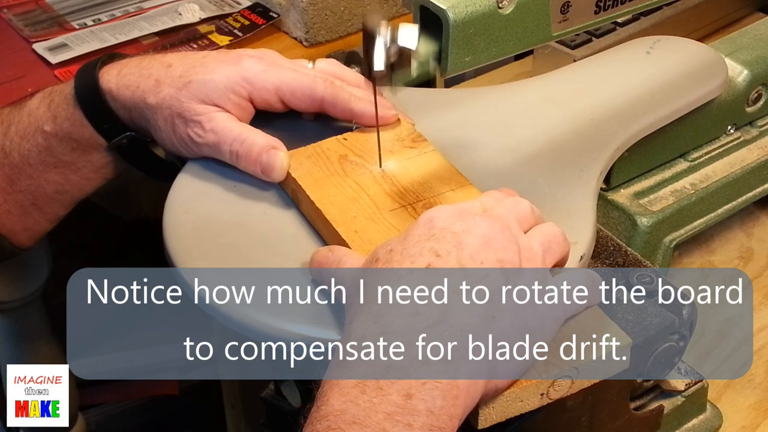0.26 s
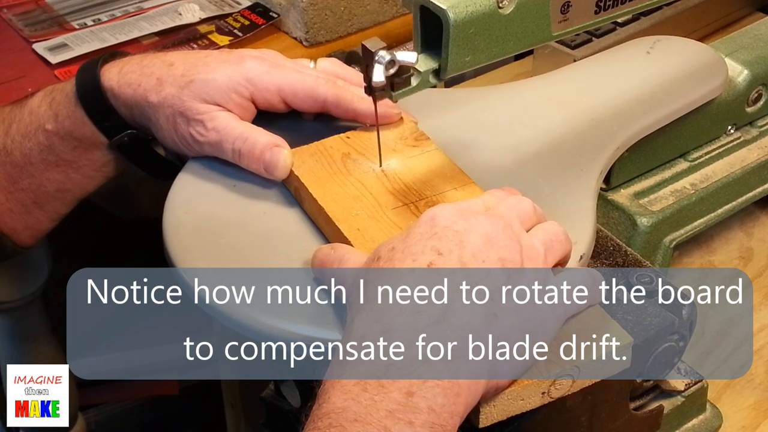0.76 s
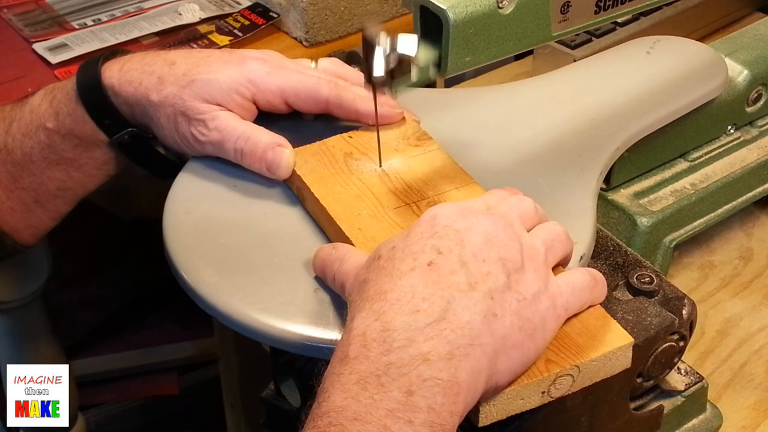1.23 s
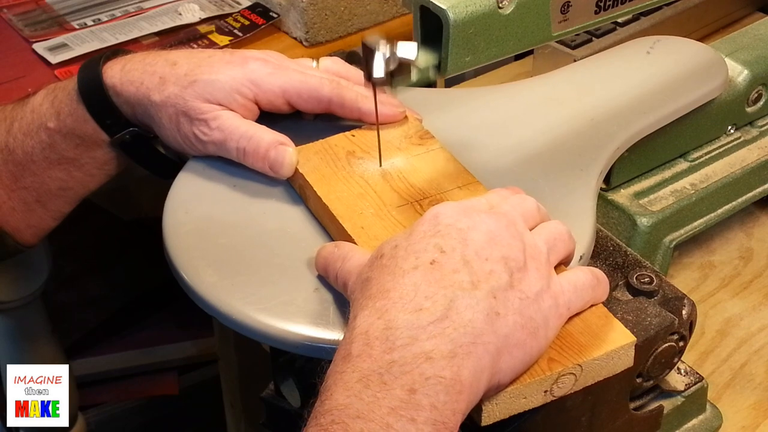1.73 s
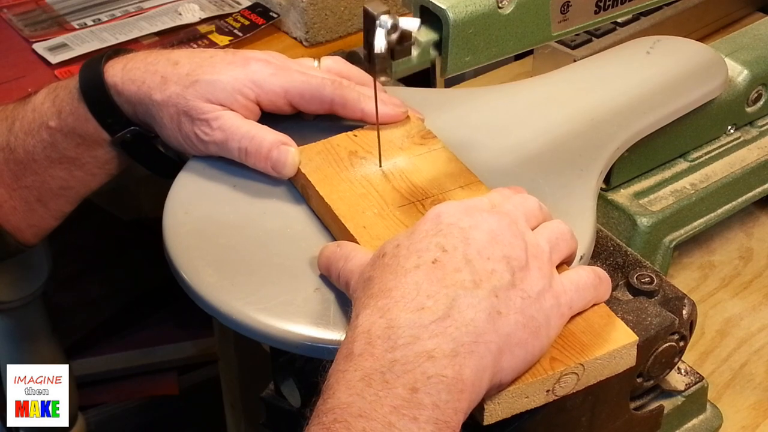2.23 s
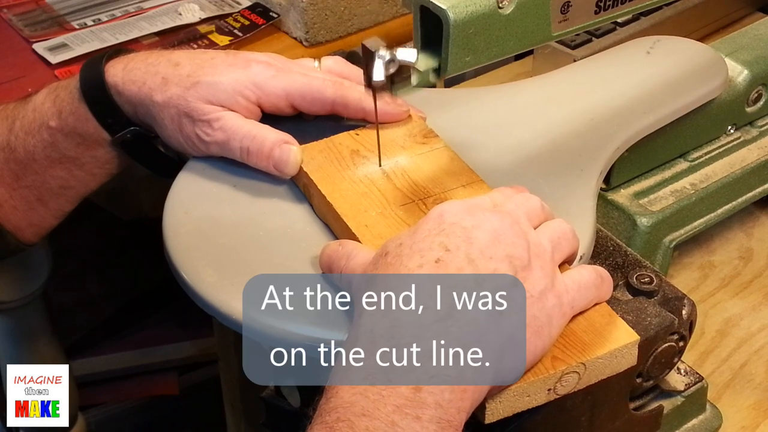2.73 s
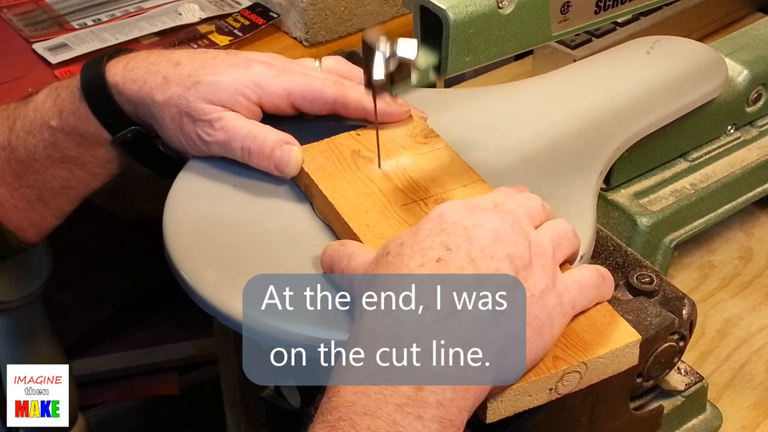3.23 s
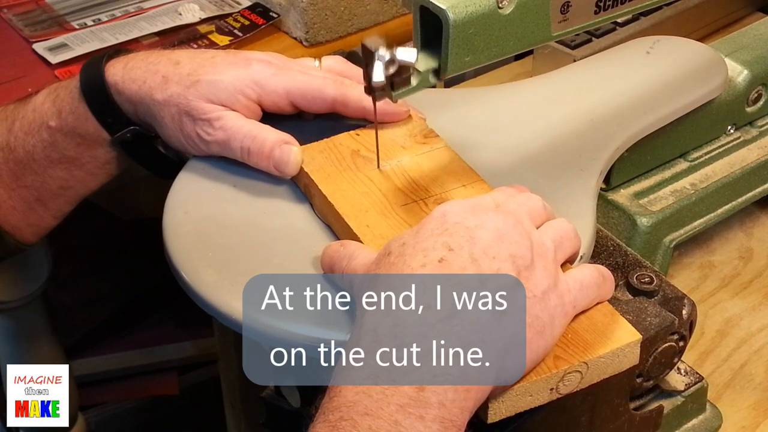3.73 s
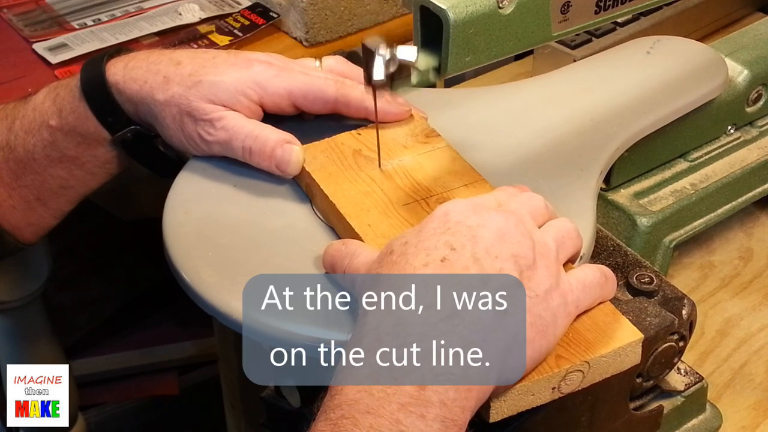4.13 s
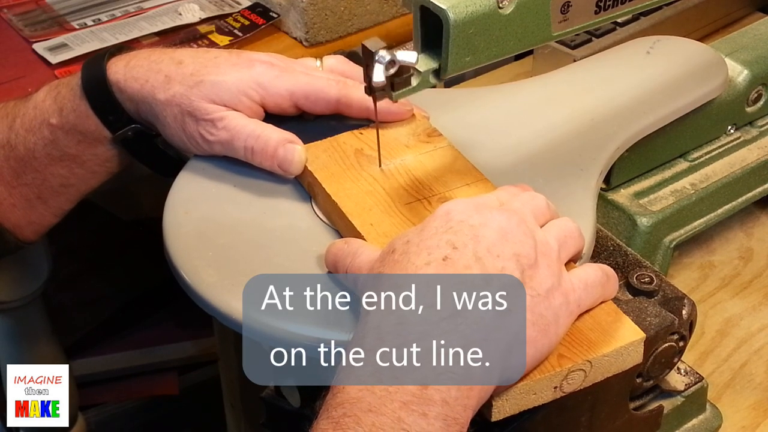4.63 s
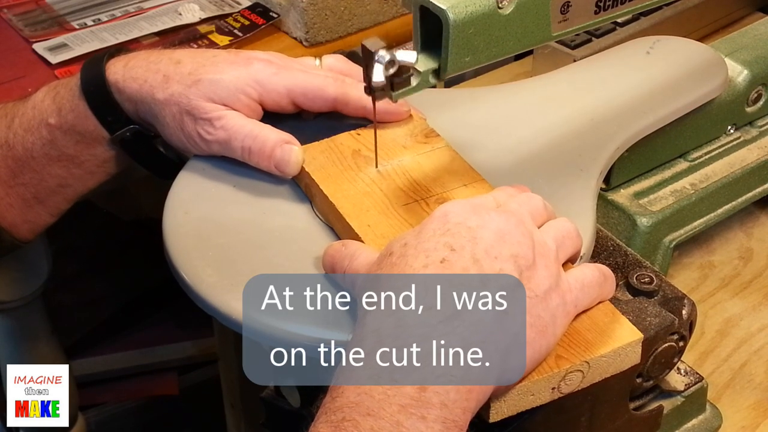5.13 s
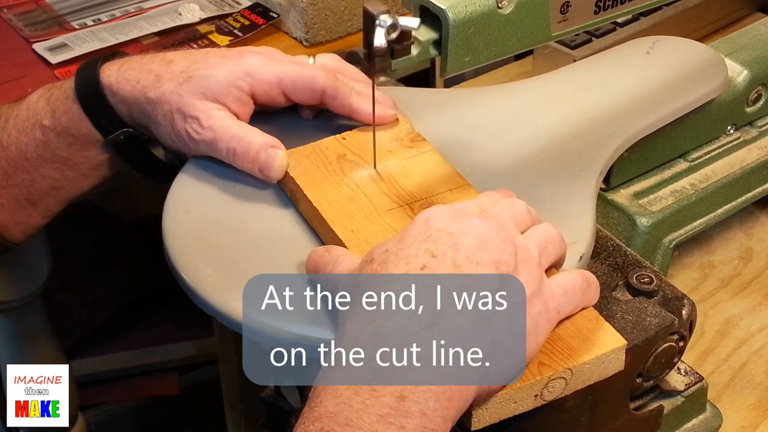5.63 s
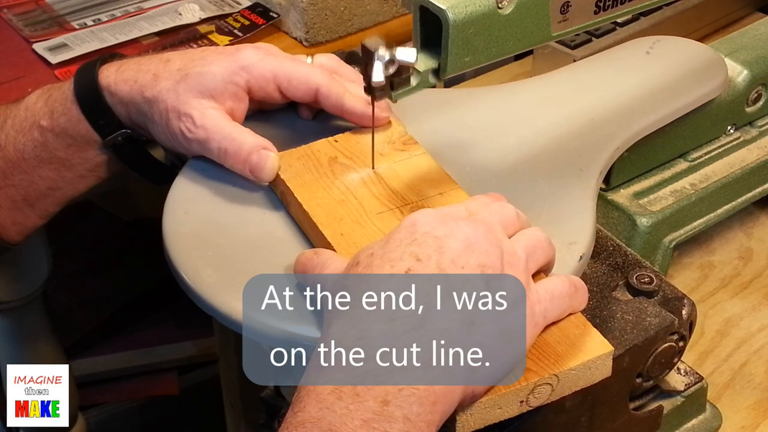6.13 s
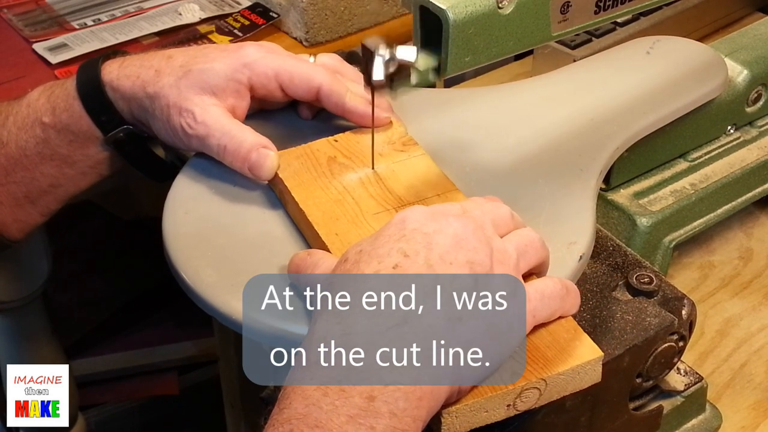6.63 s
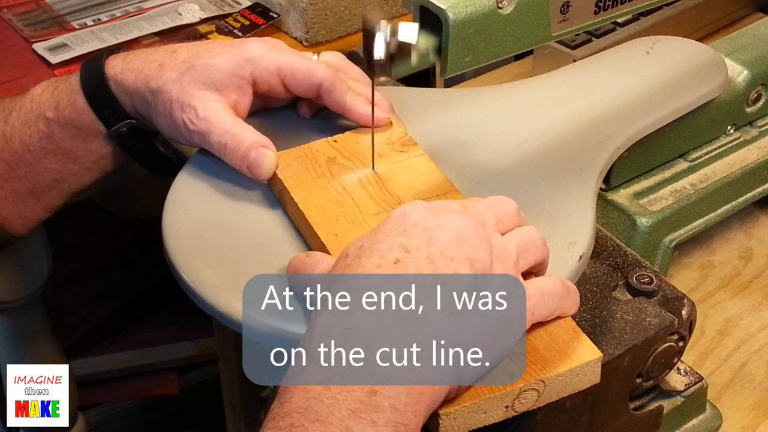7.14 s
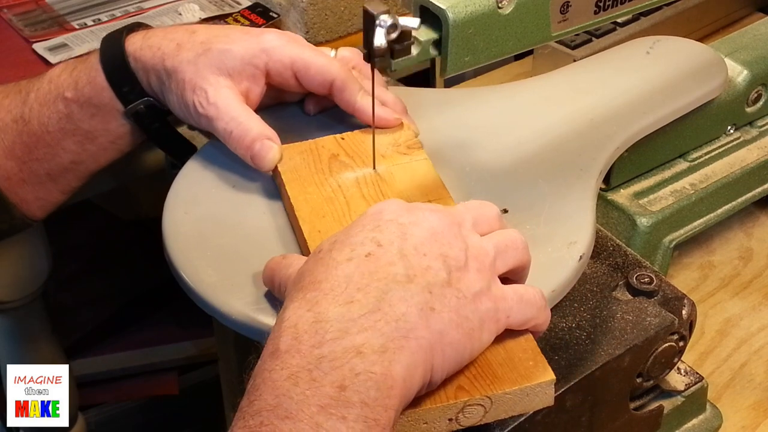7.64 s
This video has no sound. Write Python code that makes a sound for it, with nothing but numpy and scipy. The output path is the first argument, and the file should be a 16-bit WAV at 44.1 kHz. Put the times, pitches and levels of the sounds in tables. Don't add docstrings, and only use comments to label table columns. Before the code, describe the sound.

Close stereo pickup of a scroll saw cutting a board in a small workshop. Rapid strokes, about fifteen a second, blur into a gritty metallic buzz, harder down than up, with board ringing, clamp rattle and low mains hum. The bite eases and the pace quickens around five seconds; a tiny silent gap near six leads straight into more of the same cut, its load wavering.

```python
import sys
import numpy as np
from scipy import signal
from scipy.fft import rfft, irfft, next_fast_len
from scipy.io import wavfile
from scipy.ndimage import uniform_filter1d

SR = 44100
rng = np.random.default_rng(int(sys.argv[2]) if len(sys.argv) > 2 else 0)


def bounce(signal):
    frames = np.transpose(np.atleast_2d(signal))
    limited = np.clip(frames, -1, 1)
    pcm = np.round(limited * 32767).astype(np.int16)
    wavfile.write(sys.argv[1], SR, pcm)


def makeup_ratio(level_db):
    decades = np.asarray(level_db, float) / 20
    return 10 ** decades


N = 347067
SIZE = next_fast_len(N + SR // 2)
HZ = np.arange(SIZE // 2 + 1) * SR / SIZE + 1e-3
TIME = np.arange(N) / SR
CUT_S = 6.0765
LATER = TIME > CUT_S
DOWN_START_TURNS = 0.751


def rms_one(x):
    return x / np.sqrt(np.mean(x ** 2) + 1e-20)


def at_hz(points, hz):
    points = np.array(points)
    return np.interp(np.log(hz), np.log(points[:, 0]), points[:, 1])


def left_right(difference_db):
    return np.array([[.5], [-.5]]) * difference_db


def sides(hz):
    # columns f/Hz, left minus right/dB
    pan = [(100, 2), (330, 3.5), (1100, 1), (1900, 7.5), (4500, 14), (6100, 3), (7500, -4), (8600, -17.5),
           (11000, -34.5), (14000, -26.5)]
    return makeup_ratio(left_right(at_hz(pan, hz)))


def modes(table, lag_s, order=1):
    out = 0
    for k, (hz, width, db, pan_db) in enumerate(table):
        peak = 1j * width * HZ / (hz ** 2 - HZ ** 2 + 1j * width * HZ)
        late = np.exp(-2j * np.pi * HZ * lag_s * rng.random((2, 1)))
        out = out + (-1) ** k * makeup_ratio(db + left_right(pan_db)) * peak ** order * late
    return out


def through(down, up, response):
    # columns f/Hz, level/dB
    up_colour = [(300, -4.5), (800, -2), (1100, 0), (2000, 1), (3000, -0.5), (9000, -0.5)]
    drive = rfft(down, SIZE) + rfft(up, SIZE) * makeup_ratio(at_hz(up_colour, HZ))
    return irfft(drive * response, SIZE)[:, :N]


def level(db, push, hold, chatter, later_db):
    # columns t/s, push on the blade/dB, hold on the table/dB, chatter of the board/dB
    feed = [(0, -2.5, 3.5, -0.5), (.9, -1.5, 0.5, 2.5), (1.7, -1.5, -0.5, 2), (2.1, -1, 1, 1),
            (2.55, -2.5, 4.5, 2), (3.0, -2, -0.5, -3), (3.5, -2, -3, -6), (4.0, -6, -12.5, -7),
            (4.2, -2, 0, -3.5), (4.95, -2, 1, -4.5), (5.3, -11.5, -18, -10), (6.135, -10, -16, -3),
            (6.155, -4.5, -9.5, -9.5), (6.38, -9.5, -15, -5), (6.6, -4, -11, -3), (7.0, -10.5, -20, -1),
            (7.2, -7.5, -12.5, 0), (7.87, -10, -19.5, 1)]
    s, *columns = np.transpose(feed)
    push_db, hold_db, chatter_db = [np.interp(TIME, s, column) for column in columns]
    return db + push * push_db + hold * hold_db + chatter * chatter_db + later_db * LATER


def board_level():
    return level(-31.5, push=-0.34, hold=1.1, chatter=0, later_db=-3.5)


def crank_speed():
    # columns t/s, speed/(turns per s)
    speed = [(0.0, 15.267), (0.4, 14.546), (1.1, 14.516), (1.8, 14.881), (2.5, 14.909), (3.4, 15.892),
             (3.95, 16.937), (4.2, 16.321), (4.35, 15.638), (4.95, 15.514), (5.3, 17.488), (5.6, 16.995),
             (6.08, 16.821), (6.09, 16.764), (6.6, 16.237), (7.0, 16.582), (7.3, 16.358), (7.87, 16.308)]
    s, turns_per_s = np.transpose(speed)
    return np.interp(TIME, s, turns_per_s)


def crank():
    return .429 + np.cumsum(crank_speed()) / SR + .045 * LATER


def stroke(turns, start, length, skew, sharp):
    part = np.clip((turns - start) % 1 / length, 0, 1)
    return np.abs(np.sin(np.pi * part ** skew)) ** sharp


def snags():
    # columns t/s, gain/dB
    swells = [(.37, 3), (.65, 6), (.915, 0), (1.15, 5), (1.47, 8), (2.28, 0.5), (2.42, 0), (3.2, 4.5),
              (3.31, 6.5), (4.3, 2), (4.69, 5)]
    return sum(db * np.exp(-((TIME - s) / 0.035) ** 2) for s, db in swells)


def hard_catches():
    # columns t/s, peak level/dB
    catches = [(0.294, -5), (0.365, -12.5), (0.6355, -7), (0.776, -14.5), (0.844, -16.5), (0.9153, -10),
               (0.9812, -14), (1.5988, -10), (2.0018, -12), (2.2702, -21), (2.4044, -19), (2.5376, -18.5),
               (2.801, -18.5), (2.995, -7.5), (3.294, -12), (4.2966, -13), (4.4218, -23), (5.9219, -23),
               (6.1539, -19), (6.5161, -12), (6.5515, -11), (6.6752, -12.5), (6.824, -18), (7.432, -6)]
    dies_s = .007
    return sum(makeup_ratio(db - 13) * (TIME > s) * np.exp(-np.abs(TIME - s) / dies_s) for s, db in catches)


def teeth(per_s, spread_db, hiss, channels=1):
    torn = rng.random(N) < per_s / SR
    sizes = makeup_ratio(spread_db * np.minimum(rng.exponential(1, N), 4)) * torn
    signs = rng.standard_normal((channels, N))
    return rms_one(sizes * signs) + hiss * rng.standard_normal((channels, N))


def knocks(turns, at, vary_db):
    hit = np.diff(np.floor(turns - at), prepend=np.floor(turns[0] - at)) > 0
    return rms_one(hit * makeup_ratio(vary_db * rng.standard_normal(N)))


def pair_of(turns, blows, vary_db):
    return sum(size * knocks(turns, at, vary_db) for at, size in blows)


def blade(turns, luck, snag_db):
    catch_db = -9 - 5 * LATER + 2.5 * luck[2]
    catch = makeup_ratio(catch_db) * np.exp(-((turns - .865) % 1) / 0.084)
    down_db = 0.2 * luck[0] + level(-21, push=1.0, hold=0.17, chatter=0.15, later_db=0.5)
    up_db = 1.6 * luck[1] + level(-24.5, push=0.74, hold=0.12, chatter=-0.31, later_db=5)
    down = stroke(turns, DOWN_START_TURNS, length=0.47, skew=0.62, sharp=1.01) + catch
    up = stroke(turns + .03 + .05 * LATER, start=0.333, length=0.402, skew=.9, sharp=1.2)
    return makeup_ratio(down_db + 0.054 * snag_db) * down, makeup_ratio(up_db + 0.054 * snag_db) * up


def arm(turns, down, up):
    # columns f/Hz, width/Hz, level/dB, left minus right/dB
    arm_groups = [
        [(2677, 79, -5, -5), (2860, 77, -26, -6), (3010, 24, -1, -8), (3414, 57, -6, 12),
         (3660, 374, -3.5, 4.5), (3930, 35, -8, 19.5), (4070, 110, -1.5, -11), (4330, 27, -12, -6)],
        [(4520, 18, -7.5, -5), (4644, 36, -7, 19), (4788, 126, -1, 8)],
        [(4980, 42, 0.5, 14.5), (5030, 54, -4, -6.5), (5230, 146, -0.5, 9), (5184, 127, -4.5, 16),
         (5380, 88, -13, 4), (5640, 160, -14, -16)],
        [(6064, 41, -8, -10), (6590, 87, -3, 2), (6600, 21, -14, -14), (6907, 91, -12.5, -38.5),
         (6793, 33, -2.5, -12), (7114, 225, -1.5, -11.5), (7370, 50, -8, -16), (7580, 95, -11.5, -17),
         (8040, 130, -15, -21)],
    ]
    load_share = [0.16, 0.012, 0.01, 0.038]
    group_later_db = [-1., -0.56, 1.1, -1.1]
    out, hard, board_db = 0, hard_catches(), board_level()
    half_turn = np.floor(2 * turns + 0.4).astype(int)
    treble_loss = np.sqrt(1 + (HZ / 6910) ** 16)
    for group, db, share, later_db in zip(arm_groups, [-3, 1, -.5, 3], load_share, group_later_db):
        tear = teeth(1500, spread_db=1.4, hiss=1.64)
        tear = tear * makeup_ratio(db + 1.5 * rng.standard_normal(300))[half_turn]
        tear = tear * makeup_ratio(share * (board_db - board_db.max()) + later_db * LATER)
        ring = modes(group, lag_s=0.0006035) / treble_loss
        out = out + through(tear * (down + hard), tear * up, ring)
    return makeup_ratio(-23.5) * rms_one(out)


def board(turns, wood, down, up, snag_db):
    # columns f/Hz, width/Hz, level/dB, left minus right/dB
    board_rings = [(1100, 42, 0, 0), (930, 150, -17, 3), (440, 55, -12, 2), (785, 100, -13.5, 1)]
    push, pull = knocks(turns, at=.9, vary_db=1.5), knocks(turns, at=.56, vary_db=1.5)
    push = push * makeup_ratio(snag_db)
    pull = pull * makeup_ratio(snag_db + 4 * (crank_speed() - 15.2))
    ring = modes(board_rings, lag_s=0.0002, order=2)
    out = through(wood * down + 1.9 * push, wood * up + 1.43 * pull, ring)
    return makeup_ratio(board_level() + 1.47) * rms_one(out)


def clamp_and_guide(turns, wood, up, luck):
    # columns f/Hz, width/Hz, level/dB, left minus right/dB
    clamp_rings = [(1818, 32, 0, -4.5), (1915, 15, -9, 7.5)]
    # columns f/Hz, width/Hz, level/dB, left minus right/dB
    guide_rings = [(2092, 14.3, -2, 5.5), (2164, 10, -5.5, 12)]
    loose = makeup_ratio(2.5 * luck[2])
    clamp_blows = loose * pair_of(turns, [(.03, 1.6), (.41, 1.2)], vary_db=3.6)
    out = through(clamp_blows, wood * up, modes(clamp_rings, lag_s=0.00024))
    guide_blows = pair_of(turns, [(.41, 1.8), (.81, .9)], vary_db=1) / loose
    out += through(guide_blows, wood * up, modes(guide_rings, lag_s=0.00012))
    clamp_db = level(-32.5, push=1.08, hold=0.05, chatter=0.3, later_db=-7)
    return makeup_ratio(clamp_db + 2.5) * rms_one(out)


def saw_table(turns, wood, down, up, snag_db):
    # columns f/Hz, width/Hz, level/dB, left minus right/dB
    table_rings = [(221.4, 21, -7, 1), (295, 27, -12.5, 1.6), (338.3, 20.5, -2, 1.9),
                   (360.6, 18.7, 4.5, 1.7), (412.5, 18.2, -6.5, 2), (446, 32, -10.5, 2)]
    grain = wood[:, ::-1]
    slaps = pair_of(turns, [(.12, 1.8), (.8, 1.8)], vary_db=3) * makeup_ratio(snag_db)
    out = through(0.96 * grain * down + slaps, 1.8 * grain * up, modes(table_rings, lag_s=0.00023))
    table_db = level(-31, push=0.28, hold=0.3, chatter=0.76, later_db=7.5)
    return makeup_ratio(table_db - 3.1) * rms_one(out)


def scrape_and_hiss(down, up, usual, snag_db):
    # columns f/Hz, level/(dB per Hz)
    spectrum = [(25, -38), (60, -24.5), (114, -9.5), (175, -21), (358, -8.5), (500, -13.5), (930, -13.5),
                (1500, -12), (2400, -16), (5000, -14), (7300, -10.5), (9000, -28.5), (11000, -42.5),
                (15000, -39)]
    # columns f/Hz, likeness/(0 to 1)
    likeness = [(60, 0.043), (150, 0.92), (450, 0.82), (800, 0.38), (1200, 0.5), (2200, 0.87),
                (3500, 0.024)]
    alike = np.clip(at_hz(likeness, HZ), 0, 1)
    pair = teeth(6000, spread_db=3.2, hiss=1.8, channels=2)
    shares = makeup_ratio(at_hz(spectrum, HZ)) * np.sqrt([1 + alike, 1 - alike])
    mid, side = through(pair * (down + 1.24), pair * up, shares)
    broad = rfft([mid + side, mid - side], SIZE) * sides(HZ)
    dull = 1 / (1 + (HZ / 1000) ** 6)
    scrape, hiss = rms_one(irfft([broad * dull, broad * (1 - dull)], SIZE)[..., :N])
    scrape_db = level(-34.5, push=-0.12, hold=0.3, chatter=0.76, later_db=2.5)
    scrape = makeup_ratio(scrape_db + 0.67 * snag_db + 4.5) * scrape
    return scrape + makeup_ratio(-34) * (usual / np.mean(usual)) ** 0.61 * hiss


def casing(wood, down, up):
    # columns f/Hz, width/Hz, level/dB, left minus right/dB
    case_rings = [(757, 60, 4, 1), (1135, 60, -4, 1), (1235, 75, 3, 4), (3060, 330, -4, 5),
                  (2770, 90, -6, 1)]
    out = through(wood * down, wood * up, modes(case_rings, lag_s=0.00012, order=2))
    return makeup_ratio(level(-42, push=0.35, hold=0, chatter=0.18, later_db=7)) * rms_one(out)


def saw(turns):
    snag_db = snags()
    turn_number = np.floor(turns + 1 - DOWN_START_TURNS).astype(int)
    luck = rng.spawn(1)[0].standard_normal((200, 3))[turn_number].T
    down, up = blade(turns, luck, snag_db)
    usual = np.sqrt(uniform_filter1d(down ** 2 + up ** 2, size=6000))
    down = down + 0.34 * usual
    out = arm(turns, down, up)
    down, up = down / usual, up / usual
    wood = teeth(1500, spread_db=1.0, hiss=1.53) * makeup_ratio(snag_db)
    out += board(turns, wood, down, up, snag_db)
    out += clamp_and_guide(turns, wood, up, luck)
    out += saw_table(turns, wood, down, up, snag_db)
    out += scrape_and_hiss(down, up, usual, snag_db)
    return out + casing(wood, down, up)


def mains_line(hz, neighbours, turns):
    line = 0
    for orders, db, at in [(0.0034, 0, 0)] + neighbours:
        line = line + makeup_ratio(db) * np.sin(2 * np.pi * (hz * TIME + orders * (turns - at)))
    return line * sides(hz)


def hum(turns):
    # columns distance/(crank orders), level/dB, start/turns
    first_sides = [(-1, -13, .44), (1, -22, .3), (2, -27, -.2)]
    # columns distance/(crank orders), level/dB, start/turns
    second_sides = [(-1, -13, .25)]
    # columns distance/(crank orders), level/dB, start/turns
    third_sides = [(-4, -12, .09), (-2, -5.5, -.1), (-1, -12, -.06), (3, -9, .13)]
    first_db = level(-37, push=0.07, hold=0.17, chatter=0.28, later_db=5)
    second_db = level(-41, push=0.36, hold=0, chatter=-0.11, later_db=6)
    third_db = level(-38.5, push=-0.3, hold=0.93, chatter=0, later_db=10.5)
    out = makeup_ratio(first_db) * mains_line(120, first_sides, turns)
    out += makeup_ratio(second_db) * mains_line(240, second_sides, turns)
    out += makeup_ratio(third_db) * mains_line(360, third_sides, turns)
    out += makeup_ratio(second_db - 12) * np.sin(2 * np.pi * 585 * TIME) * sides(585)
    return np.sqrt(2) * out


def crank_thump(turns):
    # columns f/Hz, width/Hz, level/dB, left minus right/dB
    frame_rings = [(88, 12, 0, 1), (106.5, 9.7, 0.5, 1), (146, 11, -4, 1), (175, 18, -9.5, 1)]
    blows = knocks(turns, at=.3, vary_db=1.5) + 0.1 * rng.standard_normal(N)
    bass_loss = (1j * HZ / (64 + 1j * HZ)) ** 2
    out = through(blows, 0 * blows, modes(frame_rings, lag_s=0.00013) * bass_loss)
    return makeup_ratio(level(-51.5, push=0.4, hold=0, chatter=0.3, later_db=7)) * rms_one(out)


def guide_squeak(turns):
    hz = 10100
    slip = rms_one(stroke(turns, start=0.56, length=0.28, skew=0.23, sharp=1.2))
    squeak_db = level(-68, push=-0.87, hold=0, chatter=0, later_db=-1)
    return makeup_ratio(squeak_db) * slip * np.sin(2 * np.pi * hz * TIME) * sides(hz)


def rumble():
    band = signal.butter(2, [18, 50], "band", fs=SR, output="sos")
    noise = rng.standard_normal(N) + 0.38 * rng.standard_normal((2, N))
    return makeup_ratio(-63.5) * rms_one(signal.sosfilt(band, noise))


def shop(x, t60=0.32, cut_hz=2100.0, low_hz=490.0):
    out = np.zeros((2, len(HZ)), complex)
    for k, lag in enumerate(rng.uniform(.012, .035, 16)):
        loop = makeup_ratio(-60 * lag / t60) * np.exp(-2j * np.pi * HZ * lag) / (1 + 1j * HZ / cut_hz)
        out[k % 2] += (-1) ** (k // 2) * loop / (1 - loop)
    bass_loss = 1j * HZ / (low_hz + 1j * HZ)
    return irfft(out * rfft(x, SIZE) * bass_loss, SIZE)[:, :N]


def scene():
    turns = crank()
    cut = saw(turns)
    motor = hum(turns) + crank_thump(turns) + guide_squeak(turns) + rumble()
    return cut + makeup_ratio(-11) * shop(cut) + motor


def low_pass(x):
    return signal.sosfilt(signal.butter(12, 14880, fs=SR, output="sos"), x)


def record(dry):
    start_s, end_s = 6.089, 6.1
    rise = np.clip((TIME - start_s) / (end_s - start_s), 0, 1) ** 2
    return low_pass(dry * np.where(TIME < CUT_S, 1, rise))


dry = scene()
out = record(dry)
bounce(out)
```